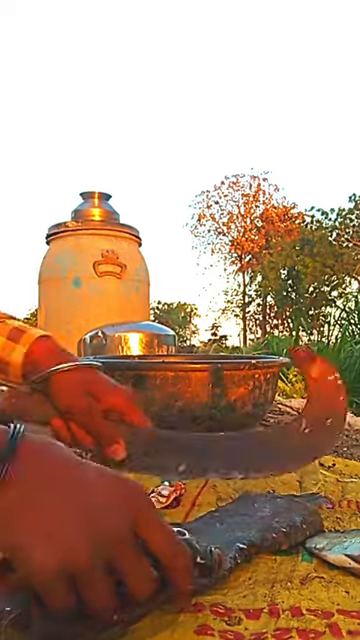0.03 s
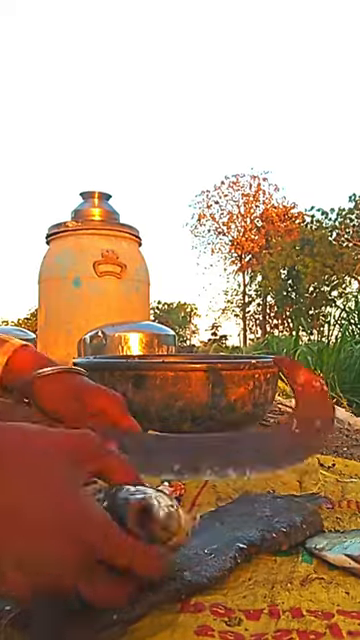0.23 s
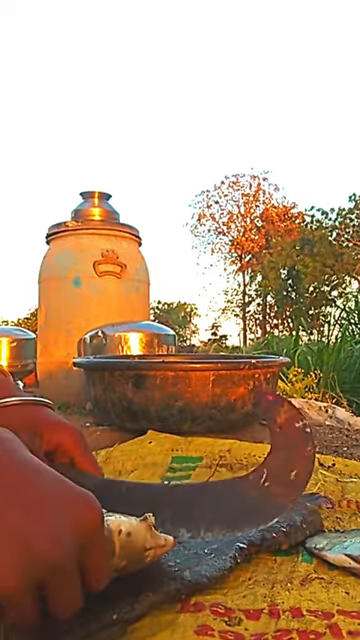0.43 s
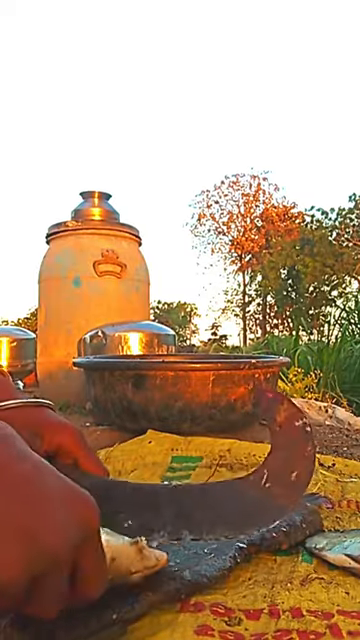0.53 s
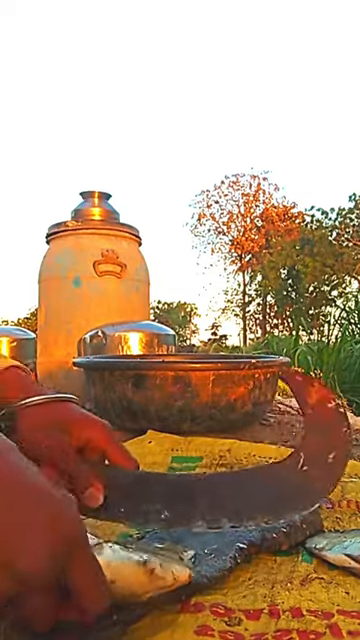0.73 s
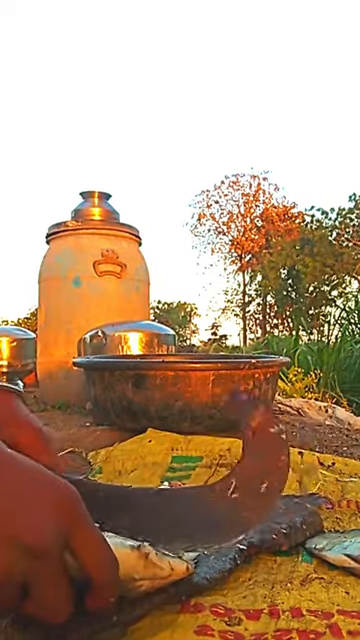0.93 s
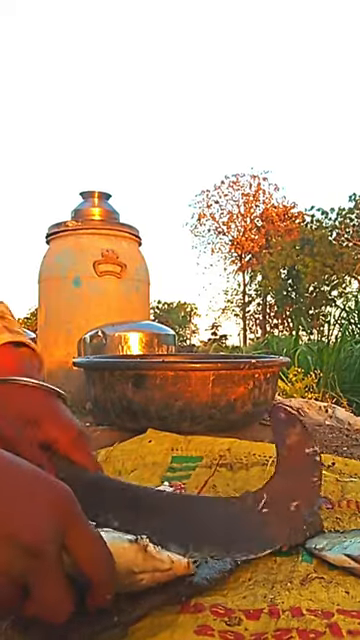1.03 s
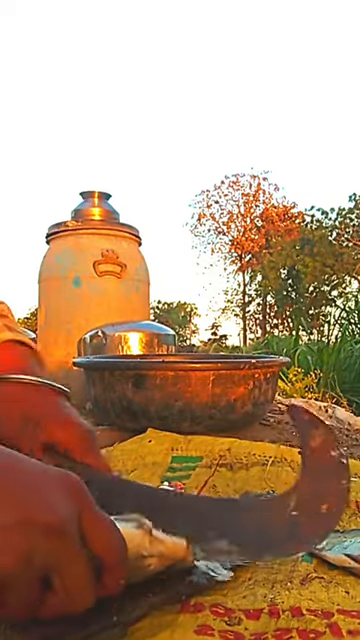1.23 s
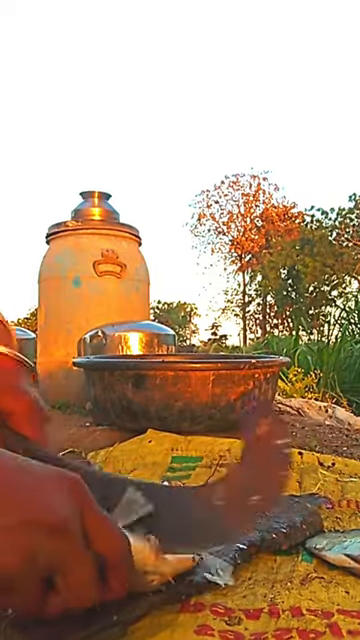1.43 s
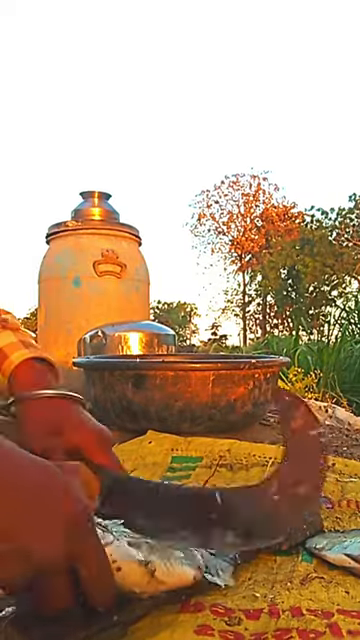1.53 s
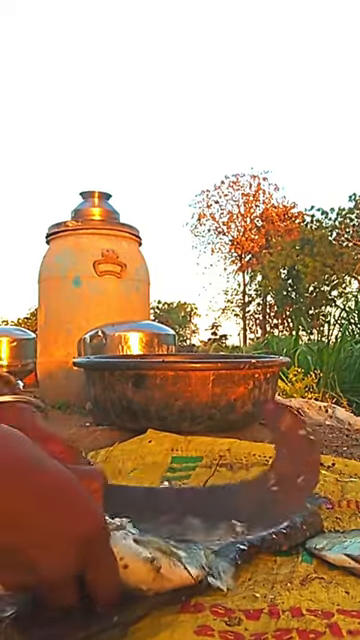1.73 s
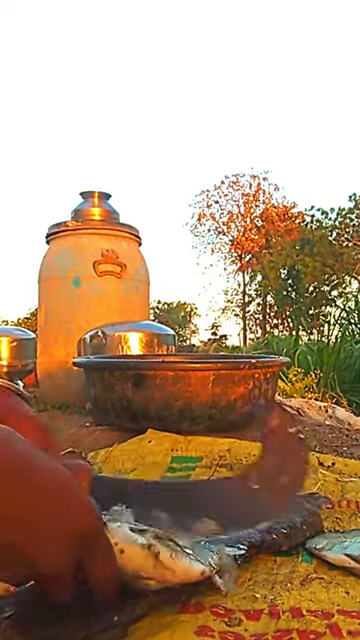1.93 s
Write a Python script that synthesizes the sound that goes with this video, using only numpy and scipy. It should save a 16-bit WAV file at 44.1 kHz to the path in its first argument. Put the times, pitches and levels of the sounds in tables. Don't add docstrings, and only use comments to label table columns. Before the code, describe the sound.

Fish scaling close to the microphone: a small fish slaps onto a stone slab, a quiet pause follows, then short crackling blade scrapes with snaps and dull thuds, over soft outdoor air, insects and a faint bird.

```python
import sys
import numpy as np
from scipy import signal
from scipy.fft import rfft, irfft
from scipy.io import wavfile

SR = 44100
rng = np.random.default_rng(int(sys.argv[2]) if len(sys.argv) > 2 else 0)


def level_to_linear(level):
    exponent = np.asarray(level, float) / 20
    return 10 ** exponent


def int16_out(signal):
    q = np.round(np.clip(np.atleast_2d(signal).T, -1, 1) * 32767)
    wavfile.write(sys.argv[1], SR, q.astype(np.int16))


N = 88200


def rms_one(x):
    return x / np.sqrt(np.mean(x ** 2) + 1e-20)


def at_hz(points, hz):
    table_hz, values = np.array(points).T
    return np.interp(np.log(hz + 1), np.log(table_hz), values)


def colour(x, points):
    hz = np.arange(N // 2 + 1) * SR / N
    inside = (hz > points[0][0] * 0.7) & (hz < points[-1][0])
    return rms_one(irfft(rfft(x) * level_to_linear(at_hz(points, hz)) * inside, N))


def drift(rate_hz):
    r = np.exp(-2 * np.pi * rate_hz / SR)
    settled = signal.lfilter([1], [1, -2 * r, r * r], rng.standard_normal(N + SR))[SR:]
    return rms_one(settled)


def ring(x, hz, t60_s):
    r = level_to_linear(-60 / (t60_s * SR))
    w = 2 * np.pi * hz / SR
    return signal.lfilter([0, np.sin(w)], [1, -2 * r * np.cos(w), r * r], x + 1e-18)


def ring_twice(x, hz, t60_s):
    return ring(ring(x, hz, t60_s), hz, t60_s) * 37 / (t60_s * SR)


def click(start_s, level_db):
    x = np.zeros(N)
    x[int(start_s * SR)] = level_to_linear(level_db)
    return x


def swell(peak_s, half_s):
    return np.exp(-((np.arange(N) / SR - peak_s) / half_s) ** 2)


def patchy(x, depth_db, rate_hz):
    hz = np.arange(N // 2 + 1) * SR / N
    place = 2.5 * np.log2(np.maximum(hz, 500) / 500)
    spectrum = rfft(x)
    out = 0
    for k in range(15):
        stretch = irfft(spectrum * np.clip(1 - abs(place - k), 0, 1), N)
        out = out + stretch * level_to_linear(depth_db * drift(rate_hz) - depth_db ** 2 / 9)
    return out


# (pitch_hz, left_over_right_db)
LEFT_OVER_RIGHT = [(40, 1), (200, -20.5), (400, -3.5), (600, -9.5), (1500, -0.5), (2800, -9.5),
                   (6000, -7.5), (13000, 11)]
LOW_CUT_HZ, LEFT_LAG_RAD = 113, 0.71


def ports(x, lag_s=0.00001):
    hz = np.arange(N + 1) * SR / (2 * N)
    gain = level_to_linear(at_hz(LEFT_OVER_RIGHT, hz))
    low_cut = signal.butter(2, LOW_CUT_HZ, "high", fs=SR, output="sos")
    right = 2 * rfft(signal.sosfilt(low_cut, x), 2 * N) / (1 + gain)
    left = right * gain * np.exp(-1j * (LEFT_LAG_RAD + 2 * np.pi * hz * lag_s))
    return irfft([left, right], 2 * N)[:, :N]


# (pitch_hz, level_db per Hz)
AIR_COLOUR = [(15, -15.5), (25, -9), (228, -7), (1060, -25), (3300, -27), (4450, -36), (6660, -26.5),
              (8730, -40), (15800, -33.5)]
# (pitch_hz, likeness 0-1)
AIR_LIKENESS = [(100, 0.78), (500, 0.43), (2500, 0.035)]
AIR_DB = -65.5
INSECT_HZ, INSECT_WIDTH_HZ, INSECT_DB, INSECT_THROB_DB = 6642, 200, -74, 2.6


def background():
    alike = np.clip(at_hz(AIR_LIKENESS, np.arange(N // 2 + 1) * SR / N), 0, 1)
    white = rfft(rng.standard_normal((3, N)))
    mixed = np.sqrt(alike) * white[0] + np.sqrt(1 - alike) * white[1:]
    air = colour(irfft(mixed, N), AIR_COLOUR)
    air_level = level_to_linear(AIR_DB + 0.96 * drift(10))

    one, other = rng.standard_normal((2, N))
    sides = np.array([one, other - 0.5 * one])
    song = rms_one(ring_twice(sides, INSECT_HZ, 2.2 / INSECT_WIDTH_HZ))
    song_level = level_to_linear(INSECT_DB + INSECT_THROB_DB * drift(30))
    return air_level * air * level_to_linear([[-1.2], [1.2]]) + song_level * song * level_to_linear([[-2.5], [1.5]])


# (peak_s, half_length_s, hiss_db, crackle_db)
BLADE_STROKES = [(0.002, 0.012, -61, -47.5), (.902, 0.0096, -61, -56), (.966, 0.0063, -52.5, -58),
                 (.976, 0.0047, -50.5, -57), (.995, 0.038, -62.5, -59.5), (1.014, 0.019, -50, -65),
                 (1.04, 0.02, -58.5, -67), (1.075, 0.15, -67.5, -66), (1.127, 0.013, -54, -71),
                 (1.168, 0.012, -55, -65), (1.187, 0.012, -47, -43), (1.212, 0.017, -46.5, -45),
                 (1.254, 0.0096, -55, -78), (1.282, 0.018, -56, -53.5), (1.321, 0.0076, -52, -59),
                 (1.358, 0.013, -54.5, -47), (1.392, 0.019, -44.5, -45.5), (1.43, 0.11, -63, -66),
                 (1.476, 0.029, -59.5, -55), (1.521, 0.014, -67, -53), (1.544, 0.0095, -46, -45.5),
                 (1.57, 0.015, -46, -47), (1.628, 0.038, -61.5, -58), (1.666, 0.0084, -54, -80),
                 (1.705, 0.028, -61.5, -53), (1.734, 0.016, -46, -46), (1.775, 0.034, -64, -62.5),
                 (1.855, 0.0037, -71, -66), (1.96, 0.026, -73.5, -75), (1.305, 0.011, -66.5, -69),
                 (1.87, 0.026, -63.5, -54.5), (1.912, 0.021, -55.5, -48.5)]
# (peak_s, half_length_s, hiss_db, crackle_db)
HAND_RUSTLES = [(0.04, 0.016, -71, -70), (0.069, 0.0076, -68.5, -60.5), (0.091, 0.0019, -55.5, -78),
                (0.252, 0.042, -66, -54), (0.357, 0.016, -73, -68.5), (0.2237, 0.0042, -56, -39),
                (0.384, 0.0065, -73.5, -80), (0.489, .005, -73, -89), (.512, .003, -69, -81),
                (0.544, .006, -76.5, -86), (0.675, 0.0072, -71, -77), (0.575, 0.015, -73.5, -75),
                (0.75, 0.034, -72.5, -87), (0.803, 0.011, -66.5, -77)]
# (pitch_hz, level_db per Hz)
HISS_COLOUR = [(1760, -10), (3000, -6), (6050, -13), (6540, -11), (7200, -13.5), (11800, -11),
               (15800, -14.5)]
HISS_ALIKE = 0.47
GRIT_PER_S, GRIT_DB = 900, 5
CRACKLE_PER_S, CRACKLE_SPREAD_DB, CRACKLE_CYCLES = 4500, 3.6, 7.0
CRACKLE_LOW_HZ, CRACKLE_HIGH_HZ, CRACKLE_TILT_DB = 338.7, 4750, 0.5


def scrape_hiss():
    grains = (rng.random(N) < GRIT_PER_S / SR) * rng.exponential(1, N)
    specks = 1 + level_to_linear(GRIT_DB) * grains
    shared = rng.standard_normal(N) * specks
    own = rng.standard_normal((2, N)) * specks
    near = ports(colour(shared, HISS_COLOUR)) * np.sqrt(HISS_ALIKE)
    wide = colour(own, HISS_COLOUR) * np.sqrt(1 - HISS_ALIKE) * level_to_linear([[4.0], [1.5]])
    return (near + wide) * level_to_linear(1.75 * drift(240))


def scrape_crackle():
    sizes = level_to_linear(CRACKLE_SPREAD_DB * np.minimum(rng.exponential(1, N), 4)) * rng.choice([-1, 1], N)
    born = rng.random(N) < CRACKLE_PER_S / SR
    dealt = rng.integers(0, 18, N)
    cracks = 0
    for k, hz in enumerate(np.geomspace(CRACKLE_LOW_HZ, CRACKLE_HIGH_HZ, 18)):
        level = level_to_linear(CRACKLE_TILT_DB * np.log2(hz / 1000))
        cracks = cracks + level * ring_twice(sizes * born * (dealt == k), hz, CRACKLE_CYCLES / hz)
    return rms_one(cracks)


def scrape():
    rows = BLADE_STROKES + HAND_RUSTLES
    hiss_gain = np.sqrt(sum((level_to_linear(hiss_db) * swell(s, half)) ** 2 for s, half, hiss_db, _ in rows))
    crack_gain = np.sqrt(sum((level_to_linear(crack_db) * swell(s, half)) ** 2 for s, half, _, crack_db in rows))
    return scrape_hiss() * hiss_gain + ports(scrape_crackle() * crack_gain * level_to_linear(-2.0))


# (peak_s, half_length_s, level_db, pitch_hz)
SLAB_THUDS = [(.003, 0.014, -41.5, 203.5), (0.24, 0.0084, -36, 236), (0.265, 0.024, -39, 225),
              (0.267, .025, -46.5, 450), (0.359, 0.012, -51, 159), (0.587, .015, -60, 119),
              (0.915, 0.0071, -46.5, 210.5), (1.007, .025, -53, 278), (1.128, 0.024, -55.5, 233),
              (1.163, 0.0053, -64, 248), (1.19, 0.013, -38.5, 223), (1.213, 0.012, -49.5, 400),
              (1.293, 0.017, -53.5, 276), (1.325, 0.01, -48, 242), (1.375, 0.012, -42.5, 293),
              (1.389, 0.014, -42, 445), (1.477, .015, -51.5, 460), (1.492, 0.0072, -45.5, 183),
              (1.525, 0.0059, -46, 275), (1.551, 0.014, -44.5, 277), (1.569, 0.0058, -35.5, 510),
              (1.714, 0.024, -43.5, 231), (1.877, 0.012, -43, 250), (1.901, 0.013, -50, 280),
              (1.919, 0.018, -75, 500)]
THUD_WIDTH_SHARE = 0.19
THUD_RUMBLE_DB, RUMBLE_HZ = -15.5, 138


def thuds():
    out = np.zeros(N)
    rumble_band = signal.butter(2, [30, RUMBLE_HZ], "band", fs=SR, output="sos")
    for s, half, db, hz in SLAB_THUDS:
        a = max(int((s - 3 * half) * SR), 0)
        b = min(int((s + 3 * half) * SR), N)
        drive = rng.standard_normal((2, 9000))
        t60_s = 1.05 / (THUD_WIDTH_SHARE * hz)
        tone = rms_one(ring(ring(drive[0], hz, t60_s), hz, t60_s)[2000:][:b - a])
        low = rms_one(signal.sosfilt(rumble_band, drive[1])[2000:][:b - a])
        shape = swell(s, half)[a:b]
        sound = (tone + level_to_linear(THUD_RUMBLE_DB) * low) * shape
        out[a:b] += level_to_linear(db) * sound * np.sqrt(np.sum(shape ** 2) / np.sum(sound ** 2))
    return out


# (start_s, peak_db, pitch_hz)
SCALE_SNAPS = [(0.0623, -55, 2500), (.195, -62, 2200), (.016, -48, 1320), (.258, -47, 1500),
               (.352, -67.5, 1970), (.901, -55, 1455), (.966, -47, 3970), (1.169, -46, 3080),
               (1.254, -44.5, 3930), (1.3115, -45, 4350), (1.3515, -52, 2500), (1.3585, -44, 2900),
               (1.398, -58, 4030), (1.5265, -47, 3200), (1.5425, -51, 4200), (1.5445, -44, 2540),
               (1.573, -54, 5460), (1.664, -54, 3970), (1.704, -50, 2200), (1.853, -59, 3200),
               (1.885, -45, 2100), (1.89, -45, 2200), (1.9, -53, 2040), (1.913, -49, 3500),
               (1.5135, -57, 3500), (0.205, -50.5, 1500), (0.928, -52, 1260), (0.974, -43.5, 2300),
               (1.01, -44, 2860), (1.055, -48, 2400), (1.18, -33.5, 1510), (1.197, -34.5, 2980),
               (1.212, -41, 2860), (1.3645, -36.5, 2930), (1.386, -34, 2540), (1.393, -37.5, 2610),
               (1.4865, -38, 730), (1.488, -37.5, 1210), (1.5135, -44.5, 1100), (1.5345, -45, 2940),
               (1.5663, -29.5, 2770), (1.594, -49, 1170), (1.735, -36.5, 3580), (1.77, -47.5, 1520),
               (1.8752, -42, 800), (1.961, -59, 4030)]
SNAP_CYCLES, SNAP_TICK_DB = 4.5, -12.5


def snaps():
    rings = sum(ring_twice(click(s, db), hz, SNAP_CYCLES / hz) for s, db, hz in SCALE_SNAPS)
    ticks = sum(click(s, db + SNAP_TICK_DB) for s, db, _ in SCALE_SNAPS)
    return rings + ring_twice(ticks, 2800, 0.001)


# (start_s, pitch_hz, level_db, t60_s)
RATTLES_AND_RINGS = [(.259, 1255, -44.5, 0.088), (.2915, 1268, -35.5, 0.023), (.263, 2385, -51, 0.063),
                     (.257, 1865, -53, 0.09), (.267, 5300, -62, .055), (.273, 3100, -64, 0.026),
                     (0.081, 640, -58, 0.057), (1.1, 655, -50, .03), (1.316, 2195, -53, .032),
                     (1.231, 713, -44.5, .036), (1.7, 2325, -55.5, 0.18), (1.417, 745, -42, 0.049),
                     (1.582, 2500, -51.5, 0.085), (1.8, 640, -55, .1), (1.8, 1150, -48, .025),
                     (1.754, 755, -43, 0.039), (1.5, 670, -53, 0.032), (1.881, 4100, -59, .055),
                     (1.924, 2332, -53.5, 0.19), (1.924, 728, -40, 0.044)]
RING_RISE_S = 0.003


def rattles_and_rings():
    t = np.arange(N) / SR
    rings = 0
    for s, hz, db, t60_s in RATTLES_AND_RINGS:
        rise = 1 - np.exp(-np.maximum(t - s, 0) / RING_RISE_S)
        rings = rings + ring(click(s, db), hz, t60_s) * rise
    return rings * (1 + 0.4 * drift(160))


# (start_s, level_db)
SLAP_TOUCHES = [
    (.2211, -16.5),
    (.2217, -8),
    (.2249, -26.5),
    (.2256, -14),
]
# (pitch_hz, level_db, t60_s)
SLAB_MODES = [(236, 0, 0.025), (555, 9, 0.0082), (821, -2, 0.024), (980, -6, 0.022), (1200, -6.5, 0.014),
              (1860, -14, 0.019), (2438, 3.5, 0.011), (2710, -10, 0.0055)]
# (pitch_hz, level_db, t60_s)
BRIGHT_MODES = [(3200, -33, 0.016), (3800, -45.5, .016), (4860, -44.5, 0.02), (5800, -50, .022),
                (6800, -45.5, 0.022), (7300, -52, .016)]
SLAP_SOFT_HZ = 4200


def slap():
    touches = sum(click(s, db) * (1 if k else -1) for k, (s, db) in enumerate(SLAP_TOUCHES))
    soft_band = signal.butter(2, [120, SLAP_SOFT_HZ], "band", fs=SR, output="sos")
    touches = signal.sosfilt(soft_band, touches)
    first_s = SLAP_TOUCHES[0][0]
    out = sum(ring_twice(click(first_s, db), hz, t60_s) for hz, db, t60_s in BRIGHT_MODES)
    for k, (hz, db, t60_s) in enumerate(SLAB_MODES):
        sign = -1 if k > 4 else 1
        out = out + sign * level_to_linear(db - 13) * ring(touches, hz, t60_s)
    return out


# (peak_s, half_length_s, pitch_hz, level_db)
BIRD_NOTES = [
    (0.447, 0.025, 3250, -77),
    (0.472, 0.016, 3180, -73),
    (1.122, 0.0097, 3275, -52.5),
    (1.265, 0.016, 3280, -57),
    (1.453, 0.043, 3250, -68.5),
    (1.639, .015, 3250, -67),
]
CHIRP_FALL_HZ_PER_S, CHIRP_HUSK_HZ = 2200, 170


def bird():
    t = np.arange(N) / SR
    notes = 0
    for s, half, hz, db in BIRD_NOTES:
        cycles = (hz - CHIRP_FALL_HZ_PER_S * (t - s) / 2) * (t - s)
        notes = notes + level_to_linear(db) * swell(s, half) * np.sin(2 * np.pi * cycles)
    return notes * (1 + 0.7 * drift(CHIRP_HUSK_HZ))


def scene():
    behind = patchy(background(), depth_db=2.0, rate_hz=12.5)
    blade = patchy(scrape(), depth_db=3.5, rate_hz=50)
    near = ports(thuds() + snaps() + rattles_and_rings())
    fish = ports(slap(), lag_s=0.00006)
    return behind + blade + near + fish + bird() * level_to_linear([[-1.5], [1.5]])


def band_limit(x):
    return signal.sosfilt(signal.butter(12, 16480, fs=SR, output="sos"), x)


RECORDER_TOP = 0.43


def record(dry):
    mix = RECORDER_TOP * np.tanh(dry / RECORDER_TOP)
    return band_limit(mix)


dry = scene()
out = record(dry)
int16_out(out)
```